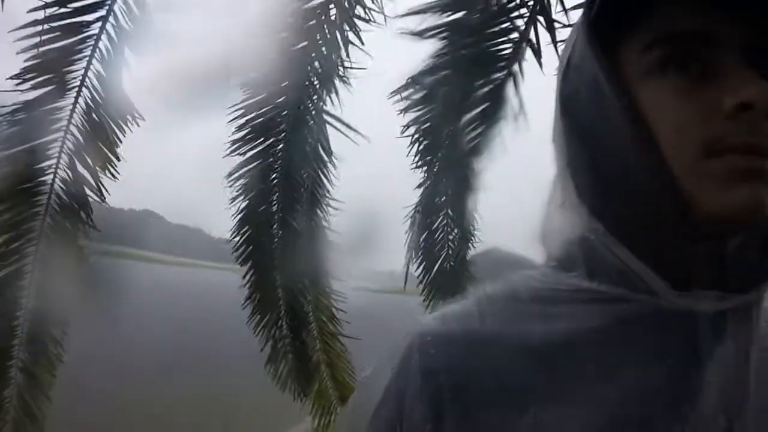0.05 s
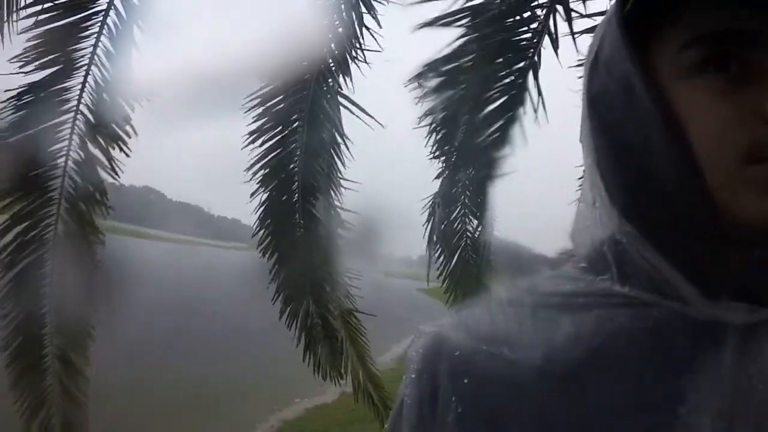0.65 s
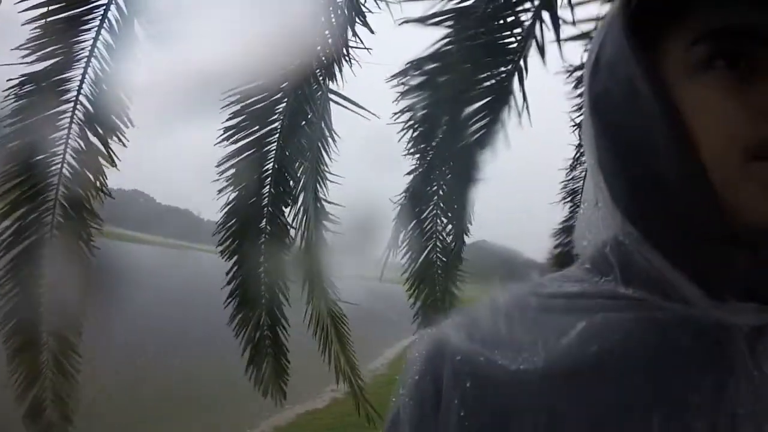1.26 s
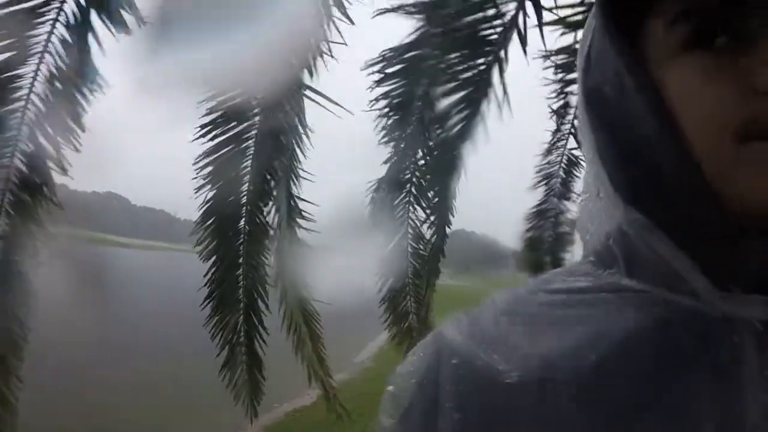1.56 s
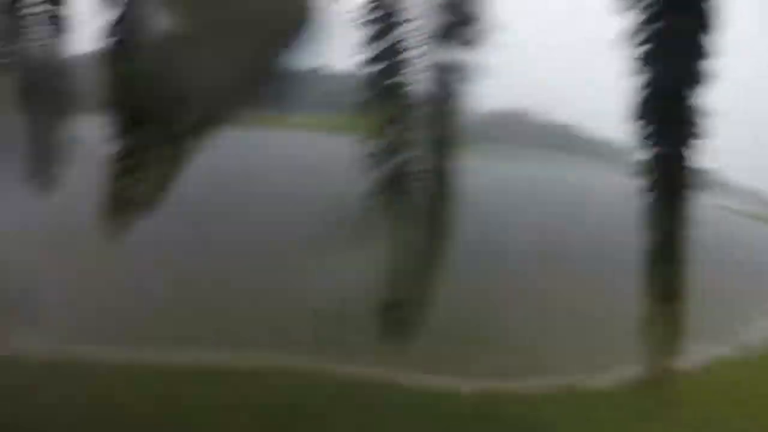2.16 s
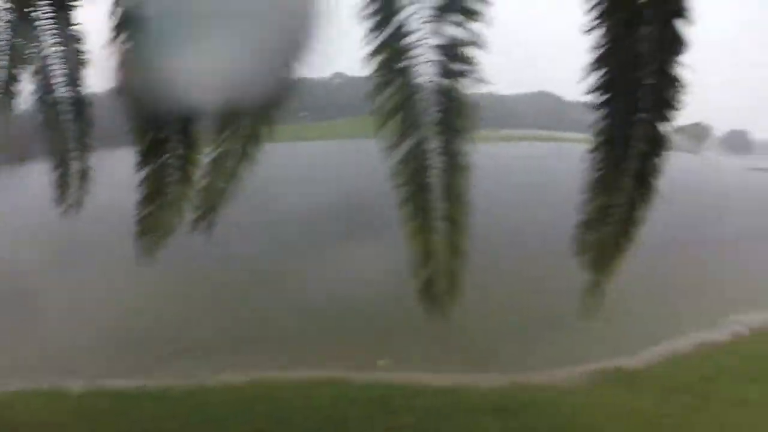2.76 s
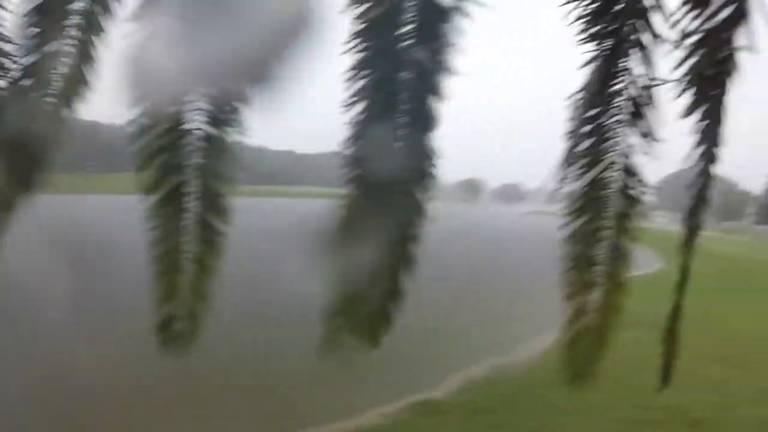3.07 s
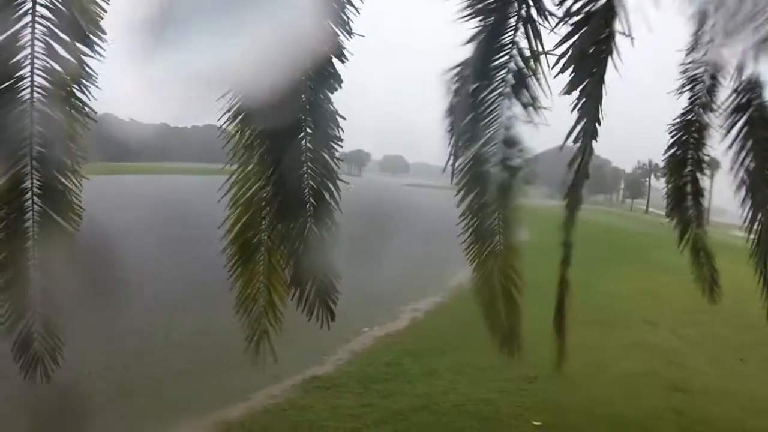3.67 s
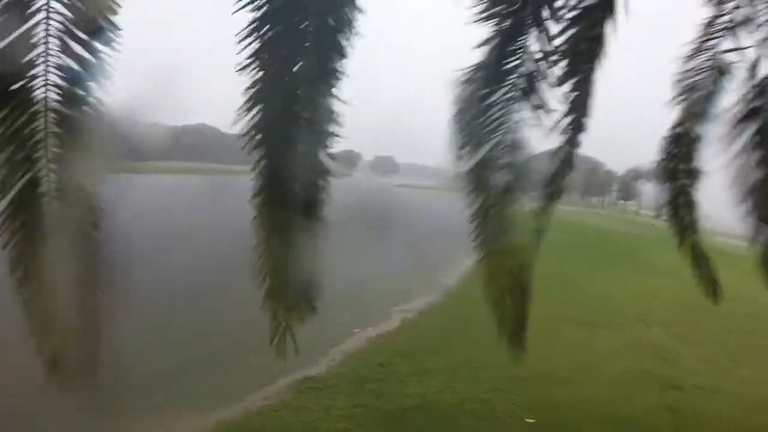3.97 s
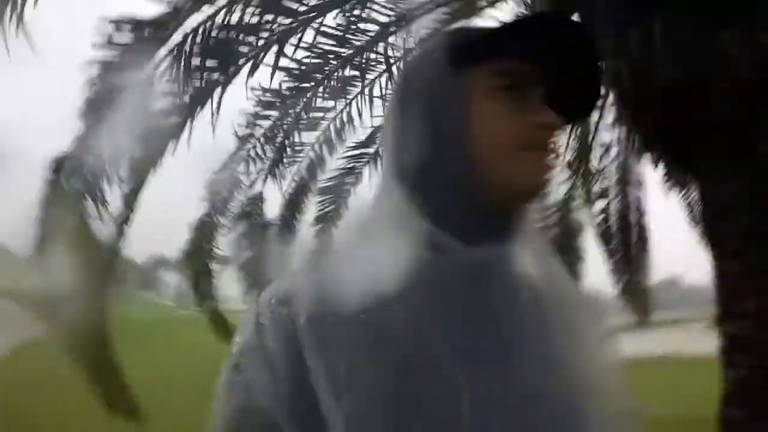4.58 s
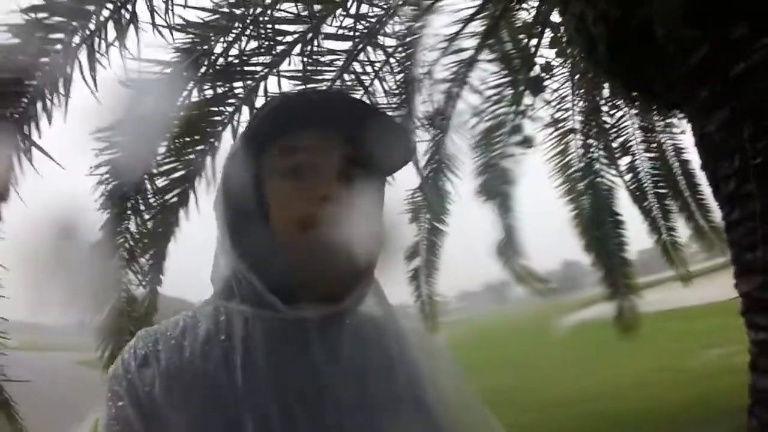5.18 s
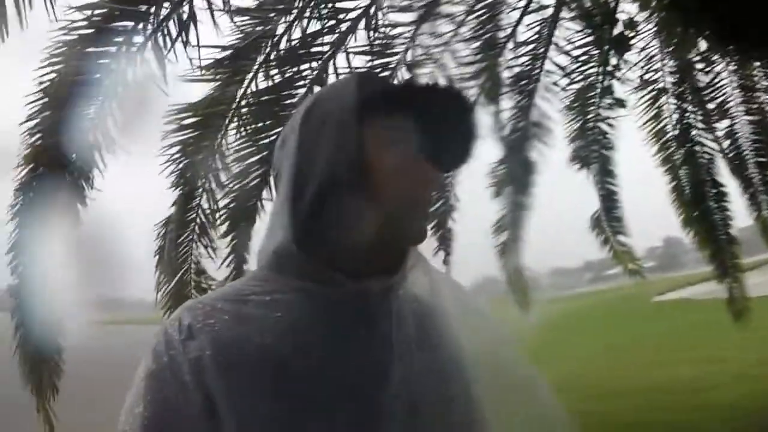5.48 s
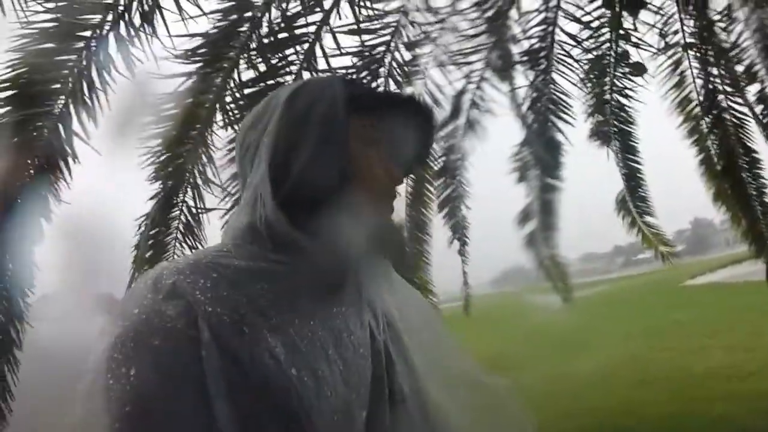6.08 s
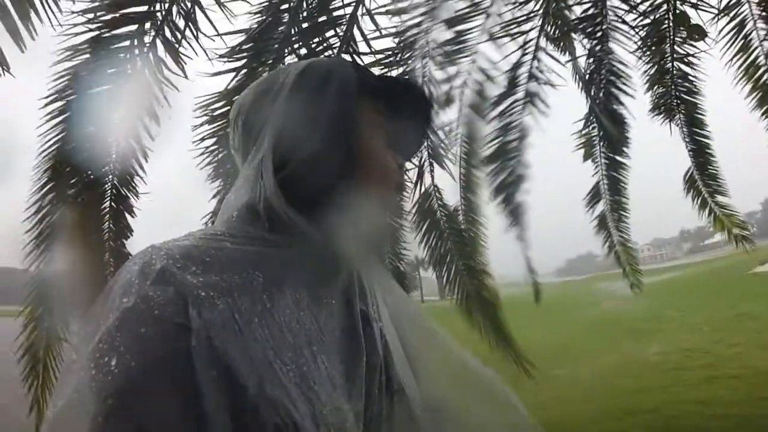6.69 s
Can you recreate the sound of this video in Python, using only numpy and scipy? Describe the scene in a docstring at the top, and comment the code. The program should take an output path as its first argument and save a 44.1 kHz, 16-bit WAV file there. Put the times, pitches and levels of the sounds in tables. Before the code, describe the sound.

Heavy rain falls outdoors under a palm by a lake, heard from inside a wet plastic camera housing. Drops tick sharply and irregularly on the shell over a hissing wash, fine patter and a low rustle, with occasional dull bumps. A few very hard drops make the background dip and swell back. Past the middle, wind briefly rumbles and buffets the case, then dies down under lighter ticks.

```python
"""Heavy rain under a palm by a lake, heard from inside a wet camera housing.
From the start, drops tick sharply on the plastic shell over a wash of rain, a fine patter and a low
rustle; now and then water smears over the case or it takes a dull bump. At 2 s, and twice in a flurry
between 3 and 4 s, a hard drop drives the gain down, and everything swells back within a second.
Just after 4 s wind rumbles and buffets the case, then dies down under lighter ticks."""
import sys
import numpy as np
from scipy import signal
from scipy.fft import rfft, irfft, next_fast_len
from scipy.io import wavfile
from scipy.ndimage import uniform_filter1d

SR = 44100
rng = np.random.default_rng(int(sys.argv[2]) if len(sys.argv) > 2 else 0)


def store_pcm(level_fs):
    """Save levels as 16-bit WAV."""
    pcm = np.round(np.clip(level_fs, -1, 1) * 32767).astype(np.int16)
    wavfile.write(sys.argv[1], SR, np.atleast_2d(pcm).T)


N = 306142
T = np.arange(N) / SR
DROP_S = .004  # the time over which a drop's level is taken
CASE_HZ, CASE_WIDTH_HZ = 227, 15.3  # the low resonance of the whole case


def undb(db):
    """Decibels to gain."""
    return 10 ** (np.asarray(db) / 20)


def unit(x):
    """Scale to rms 1."""
    return x / np.sqrt(np.mean(x ** 2))


def unit_ring(rings):
    """Give each ring the energy of rms 1 held for DROP_S."""
    return rings / np.sqrt(np.sum(rings ** 2, axis=-1, keepdims=True) / (DROP_S * SR))


def add(out, start_s, sound):
    """Mix a sound in at a time."""
    i = int(np.clip(start_s * SR, 0, N - 1))
    out[i:i + len(sound)] += sound[:N - i]


def wander(rate_hz):
    """A slow random drift at rms 1."""
    step = int(SR / rate_hz)
    stairs = np.repeat(rng.standard_normal(N // step + 1), step)
    return unit(uniform_filter1d(stairs, step)[:N])


def colour(x, points):
    """Shape a sound with an EQ curve of (Hz, dB) points, rolled off past its ends, at rms 1."""
    hz, db = np.transpose(points)
    size = next_fast_len(N + SR)
    f = np.maximum(np.fft.rfftfreq(size, 1 / SR), 1)
    rolloff = (np.minimum(f / hz[0], 1) * np.minimum(hz[-1] / f, 1)) ** 2
    curve = undb(np.interp(np.log(f), np.log(hz), db))
    return unit(irfft(rfft(x, size) * rolloff * curve, size)[:N])


def resonate(x, hz, width_hz):
    """One damped mode, gain 1 at its centre."""
    hz = min(hz, .45 * SR)
    return signal.lfilter(*signal.iirpeak(hz, hz / width_hz, fs=SR), x)


def soften(x, hz):
    """A drop takes a moment to flatten, which rounds the onset and dulls what lies above hz."""
    return signal.sosfilt(signal.butter(2, hz, fs=SR, output="sos"), x)


def impacts(per_s, spread_db, top_db):
    """Random clicks, most near gain 1; spread_db sets how far the rare ones stray."""
    size = undb(np.minimum(spread_db * rng.exponential(size=N), top_db))
    return (rng.random(N) < per_s / SR) * size * np.sign(rng.standard_normal(N))


def patter(modes, per_s, spread_db, top_db, splash_s):
    """Small droplets tap a set of modes, each with a tiny burst of noise."""
    taps = np.abs(impacts(per_s, spread_db, top_db))
    splash = signal.lfilter([1], [1, -np.exp(-1 / (splash_s * SR))], taps)
    push = splash * rng.standard_normal(N)
    return unit(sum(undb(db) * resonate(push, hz, width) for hz, width, db in modes))


# The dark tone of the rustle. Each row: frequency in Hz, relative level in dB.
RUSTLE_EQ = [(70, 7.5), (150, 3), (200, 2.5), (320, -1.5), (450, -3), (900, -6), (1700, -27)]


def rustle(level_db):
    """A low rustle of wet things moving close by, which keeps the case humming faintly."""
    noise = colour(rng.standard_normal(N), RUSTLE_EQ)
    hum = resonate(noise, CASE_HZ, CASE_WIDTH_HZ)
    return (noise + undb(-4) * hum) * undb(level_db + wander(rate_hz=32))


# The deep tone of the wind. Each row: frequency in Hz, relative level in dB.
WIND_EQ = [(10, -6.5), (25, 2.5), (45, -3.5), (70, 0), (100, -17.5), (160, -21.5), (400, -32.5)]
# The fader ride on the rumble. Each row: time in seconds, level in dB.
WIND_RIDE = [(0, -49), (1.85, -51), (2.15, -41), (2.5, -51), (3.0, -47.5), (3.2, -54), (4.0, -59.5),
             (4.3, -31.5), (4.45, -39), (4.8, -43.5), (5.1, -48), (6.94, -56)]
# Eddies thumping the case. Each row: centre in seconds, pitch in Hz, peak level in dB.
BUFFETS = [(3.004, 87, -37), (4.323, 61.4, -26), (4.538, 63, -28.5), (4.671, 48, -22.5),
           (4.817, 47.4, -30.5)]


def wind():
    """Turbulent rumble, with single eddies that shove the housing for a cycle or two."""
    ride_db = np.interp(T, *np.transpose(WIND_RIDE))
    rumble = colour(rng.standard_normal(N), WIND_EQ)
    out = rumble * undb(ride_db + 2 * wander(rate_hz=9) - .8)
    for centre_s, hz, db in BUFFETS:
        cycles = (T - centre_s) * hz
        out += undb(db) * np.cos(2 * np.pi * cycles) * np.exp(-(cycles / .8) ** 2)
    return out


# The housing's three voices, shared by all water that hits it: plastic wall, air cavity, bright crack.
# Each row: pitch in Hz, bandwidth in Hz, relative level in dB.
WALL_MODES = [(986, 1300, -10), (1423, 136, 1.5), (1650, 1020, 1)]
CAVITY_MODES = [(1871, 230, 8.5), (2453, 390, 9), (2500, 110, 6.5)]
CRACK_MODES = [(3145, 260, 0.5), (3690, 1200, -1), (4430, 210, -5), (5336, 210, -3), (6100, 1570, -6.5),
               (8800, 1800, -18.5), (12500, 6300, -24.5)]
# The tone of the wash through the cavity. Each row: frequency in Hz, relative level in dB.
WASH_EQ = [(500, -50), (1000, -9.5), (1600, -3.5), (1870, -12.5), (2080, -2), (2430, 4), (2950, -8.5),
           (4200, -8.5), (5300, -4.5), (6500, -14), (8000, -20), (9100, -16), (11500, -24), (15000, -28.5)]
# The fader ride on the rain. Each row: time in seconds, level in dB.
RAIN_RIDE = [(0, -48), (0.2, -46), (0.5, -50.3), (2.4, -52), (2.95, -47.5), (3.3, -47.3), (3.9, -50),
             (4.8, -53.5), (6.94, -51)]


def rain():
    """Countless drops on lake, grass and fronds merge into a wash; spray and drips tap the shell."""
    ride_db = np.interp(T, *np.transpose(RAIN_RIDE))
    wash = colour(impacts(per_s=7000, spread_db=-.5, top_db=6), WASH_EQ)
    wash *= undb(.5 * wander(rate_hz=17) - .97)
    spray = patter(CAVITY_MODES + CRACK_MODES, per_s=70, spread_db=5, top_db=13, splash_s=.0003)
    spray = undb(-6) * soften(spray, hz=13000)
    drips = patter(WALL_MODES + CAVITY_MODES, per_s=18, spread_db=4, top_db=9, splash_s=.0009)
    drips = undb(-32) * soften(drips, hz=3600)
    return undb(ride_db) * (wash + spray) + undb(.5 * ride_db) * drips


# Dull knocks on the case. Each row: start in seconds, level in dB.
BUMPS = [(0.389, -41.5), (1.976, -28.5), (1.985, -31.5), (2.74, -44), (2.801, -44), (3.259, -40),
         (3.329, -40), (4.279, -36), (4.965, -34), (5.579, -41), (6.688, -35.5)]


def bumps(flex_hz=313, flex_width_hz=47, flex_db=-4):
    """The whole case hums briefly after a dull blow; a higher flexing mode dies sooner."""
    t = T[:SR // 6]
    thud_and_tail = .94 * np.exp(-t / .0046) + .61 * np.exp(-np.pi * CASE_WIDTH_HZ * t)
    hum = np.sin(2 * np.pi * CASE_HZ * t) * thud_and_tail
    flex = undb(flex_db) * np.sin(2 * np.pi * flex_hz * t) * np.exp(-np.pi * flex_width_hz * t)
    out = np.zeros(N)
    for start_s, db in BUMPS:
        add(out, start_s, undb(db) * (hum + flex))
    return out


# Water smearing over the shell. Each row: centre in seconds, half length in seconds, level in dB.
SMEARS = [(0.39, 0.014, -44), (0.842, 0.0069, -37), (1.109, 0.0072, -39), (3.285, 0.014, -37),
          (3.337, 0.011, -38), (4.275, 0.017, -39), (5.589, 0.012, -45.5)]


def smears():
    """Running water rubs the wall of the housing in short crackly bursts."""
    crackle = patter(WALL_MODES + CAVITY_MODES, per_s=900, spread_db=3, top_db=10, splash_s=.0005)
    bursts = sum(undb(db) * np.exp(-((T - centre_s) / half_s) ** 2) for centre_s, half_s, db in SMEARS)
    return unit(soften(crackle, hz=1030)) * bursts


def strike(rows, modes, splash_s, splash_db, spray_s, spray_db, detune, spot_db):
    """One ring per drop: an impact, a brief splash and a faint spray excite the modes."""
    t = T[:SR // 40]
    hz, width, db = np.transpose(modes)
    wet_tail = undb(splash_db) * np.exp(-t / splash_s) + undb(spray_db) * np.exp(-t / spray_s)
    draws = rng.standard_normal((len(rows), 3, len(t)))
    rings = []
    for (_, spot_hz, _, _), (noise, direction, load) in zip(rows, draws):
        push = .14 * noise * wet_tail
        push[0] += 1  # the impact
        # the struck spot brings out the modes near its own pitch, and starts each inwards or outwards
        nearness = np.exp(-(np.log2(spot_hz / hz) / .26) ** 2)
        gain = np.sign(direction[:len(hz)]) * undb(db + spot_db * nearness)
        # the film of water loads the shell differently at every blow
        loaded_hz = hz * (1 + detune * load[:len(hz)])
        rings.append(sum(g * resonate(push, f, w) for f, w, g in zip(loaded_hz, width, gain)))
    attack = 1 - np.exp(-t / .00028)  # the force builds while the drop flattens
    return np.array(rings) * attack


def radiate(rings, low_hz, high_hz):
    """A small part radiates no bass and a soft drop excites little top; rings leave equally strong."""
    band = signal.butter(2, [low_hz, high_hz], "band", fs=SR, output="sos")
    return unit_ring(signal.sosfilt(band, rings))


def scatter_drops(count, smallest_db, range_db, lowest_hz, octaves):
    """Rows like BIG_DROPS for small drops at random times; those on higher spots crack more."""
    when, spot, size = rng.random((count, 3)).T
    rise = octaves * spot
    level_db = smallest_db + range_db * size ** 2
    crack_db = -18.5 + 8.5 * rise
    return np.transpose([when * T[-1], lowest_hz * 2 ** rise, level_db, crack_db])


# The foreground ticks: big drops on the housing. Each row: start in seconds, pitch that the landing
# spot favours in Hz, level in dB, crack in dB relative to the ring.
BIG_DROPS = [(0.2746, 1490, -30.5, -2), (0.3422, 2200, -21, -12), (0.3953, 2340, -31, -7),
             (0.4387, 2510, -19.5, -12), (0.45, 6700, -26, -4), (0.4672, 6400, -35.5, 8),
             (0.4841, 4270, -33, 1), (0.5343, 1210, -29, -16), (0.538, 6200, -23.5, 17),
             (0.6678, 2600, -13, -0.5), (1.1266, 1310, -10.5, -8), (1.1706, 3380, -29, -2.5),
             (1.2393, 2510, -30, -31), (1.5503, 1870, -28, -2), (1.6288, 1740, -24, -22),
             (1.8789, 1620, -19, -4.5), (1.9751, 1500, -27.5, -21), (1.9861, 1050, -29, -19),
             (2.0482, 2060, 0.5, -10.5), (2.0983, 1440, -31.5, -16), (2.126, 1070, -34.5, -28),
             (2.2662, 1910, -32, -11.5), (2.555, 1980, -28.0, -9), (2.7308, 2100, -14.5, -9),
             (2.8025, 1570, -25, -5), (2.8578, 1660, -26, -2.5), (2.9306, 2450, -18, 2),
             (2.959, 3470, -9.5, -5.5), (2.9888, 2150, -28, -18), (3.124, 1560, -32, -3),
             (3.2883, 1450, -20.5, -17.5), (3.3169, 4100, -14.5, 0), (3.3361, 5060, -28, 7),
             (3.3597, 2570, 4, -6), (3.4814, 2000, -16, -3), (3.5041, 2040, -12.5, -10.5),
             (3.5249, 1920, -15.5, -5.5), (3.5596, 1700, -16.5, -14), (3.5954, 2400, -9, 1),
             (3.6147, 2510, -18, -21), (3.7039, 2140, -12.5, -14), (3.7945, 1810, 4.5, -22),
             (3.8601, 1080, -22.5, -14), (3.934, 2150, -24.5, -10), (3.9662, 1610, -19, -16),
             (4.3875, 2050, -10.5, -9.5), (4.745, 1920, -34, -7), (4.8128, 1330, -29, -11.5),
             (4.8502, 1730, -35, -6), (4.9279, 2750, -17.5, -4), (4.9424, 1720, -24.5, 3),
             (4.9656, 1370, -18.0, -24), (5.0035, 3530, -32, 2), (5.0198, 3830, -26.5, 8),
             (5.0959, 1570, -21.5, -4.5), (5.1423, 1950, -23.5, -10), (5.2701, 4650, -27.5, -3.5),
             (5.292, 1460, -31.5, -32), (5.4771, 1700, -14, -9), (5.5767, 1300, -27.5, -21),
             (5.6427, 1690, -30, -13), (5.7691, 3680, -34, 3), (5.8281, 2620, -31, 1.5),
             (5.883, 3500, -37, 10), (5.9169, 1520, -34.5, -11), (5.9913, 4020, -37, 9),
             (6.0066, 2500, -34.5, -4), (6.2489, 2600, -36.5, -1), (6.4715, 2600, -33.5, 3),
             (6.4772, 2470, -28, -6), (6.686, 1740, -20.5, -11), (6.6943, 1050, -19.5, -4),
             (6.7326, 1680, -14, -0.5), (6.923, 1510, -30.5, -6)]


def drops(rows, balance_hz=1618, wall_db_per_octave=29, wall_limit_db=13.5):
    """Each drop rings the wall and the air cavity for a few milliseconds and cracks as it bursts."""
    wall = strike(rows, WALL_MODES, splash_s=.0008, splash_db=-4,
                  spray_s=.004, spray_db=-22, detune=.04, spot_db=7)
    cavity = strike(rows, CAVITY_MODES, splash_s=.0007, splash_db=-6,
                    spray_s=.0035, spray_db=-22, detune=.015, spot_db=7)
    crack = strike(rows, CRACK_MODES, splash_s=.0006, splash_db=8,
                   spray_s=.003, spray_db=-12, detune=.035, spot_db=13)
    wall = radiate(wall, low_hz=860, high_hz=2200)
    cavity = radiate(cavity, low_hz=1490, high_hz=3060)
    crack = radiate(soften(crack, hz=13100), low_hz=2200, high_hz=14600)
    t = T[:SR // 40]
    case_nudge = undb(-5) * np.sin(2 * np.pi * CASE_HZ * t) * np.exp(-t / .0008)
    out = np.zeros(N)
    for k, (start_s, spot_hz, db, crack_db) in enumerate(rows):
        # low spots ring the wall, high spots the cavity; both ring alike at balance_hz
        wall_db = np.clip(wall_db_per_octave * np.log2(balance_hz / spot_hz),
                          -wall_limit_db, wall_limit_db)
        ring = unit_ring(undb(wall_db) * (wall[k] + case_nudge) + cavity[k])
        add(out, start_s, undb(db) * unit_ring(ring + undb(crack_db) * crack[k]))
        # a droplet thrown off by the burst lands on another spot a moment later
        delay, size, hardness = rng.random(3)
        droplet = hardness * crack[k - 1] + (1 - hardness) * (cavity[k - 1] + wall[k - 1])
        add(out, start_s + .0056 + .035 * delay, undb(-54.5 + 11.9 * size) * droplet)
    return out


def scene():
    """The mono mix: drops, smears and bumps over a bed of rain, rustle and wind."""
    small_drops = scatter_drops(count=80, smallest_db=-45, range_db=6.5, lowest_hz=1094, octaves=2.3)
    ticks = drops(BIG_DROPS) + drops(small_drops)
    return (ticks + smears() + bumps() + rain() + rustle(level_db=-56.5) + wind())[None]


def gain_control(x, ceiling_db, recovery_db_per_s):
    """The gain falls at once by as much as a drop exceeds the ceiling, then climbs steadily back."""
    power = uniform_filter1d(x ** 2, int(DROP_S * SR))
    level_db = 10 * np.log10(np.maximum(power, 1e-12))
    excess_db = np.maximum(level_db - ceiling_db, 0)
    climb_db = recovery_db_per_s * T
    cut_db = np.maximum.accumulate(excess_db + climb_db, axis=-1) - climb_db
    return x * undb(-cut_db)


def record(dry):
    """Gain control ducks after the hardest ticks, their peaks are rounded off, and the top is cut."""
    ducked = gain_control(dry, ceiling_db=-7.5, recovery_db_per_s=16)
    rounded = ducked / (1 + (ducked / 1.2) ** 8) ** (1 / 8)
    high_cut = signal.ellip(8, .2, 70, 15500, fs=SR, output="sos")
    return signal.sosfilt(high_cut, rounded)


dry = scene()
out = record(dry)
store_pcm(out)
```